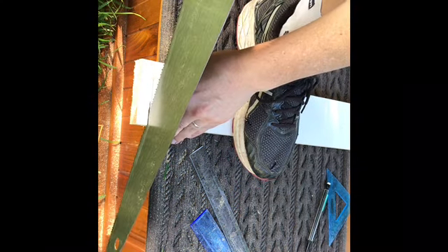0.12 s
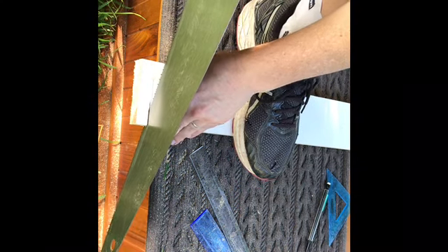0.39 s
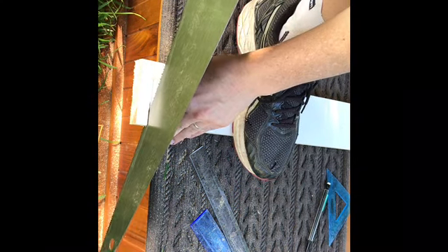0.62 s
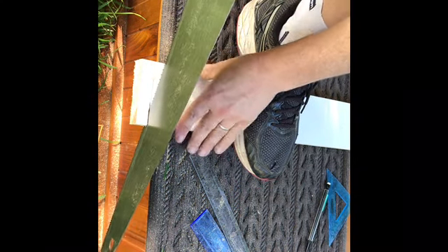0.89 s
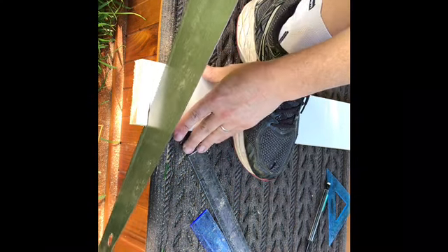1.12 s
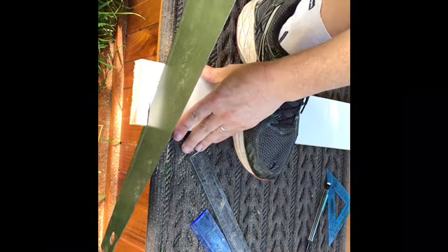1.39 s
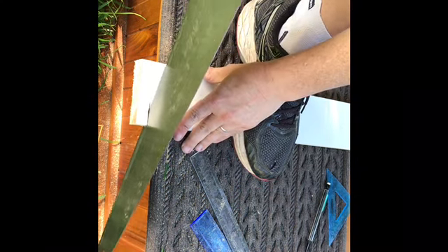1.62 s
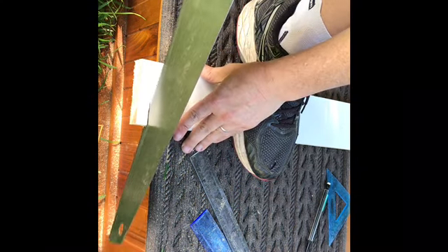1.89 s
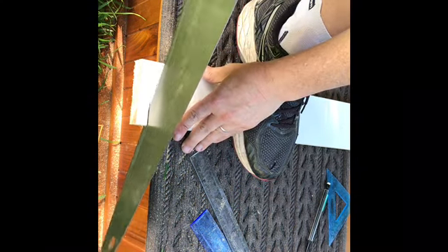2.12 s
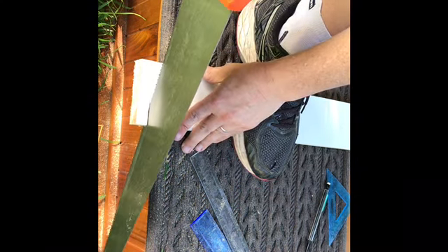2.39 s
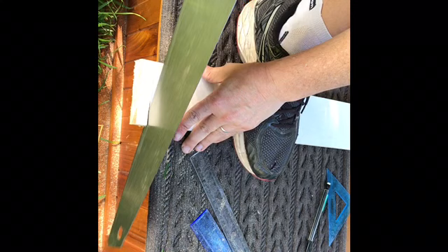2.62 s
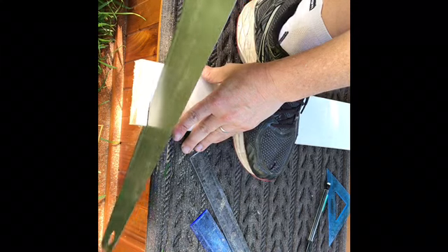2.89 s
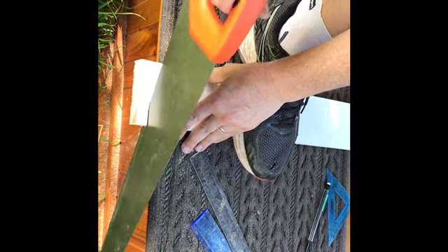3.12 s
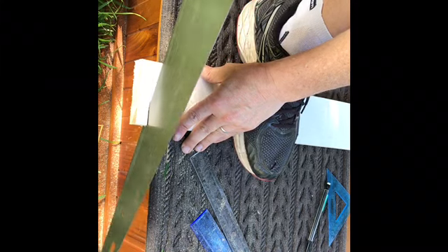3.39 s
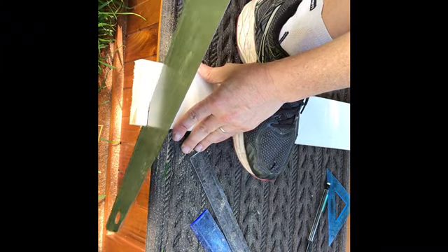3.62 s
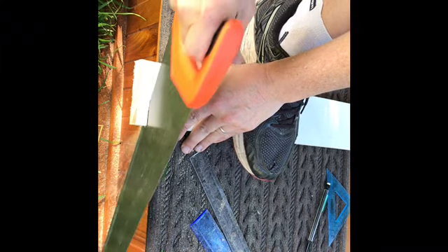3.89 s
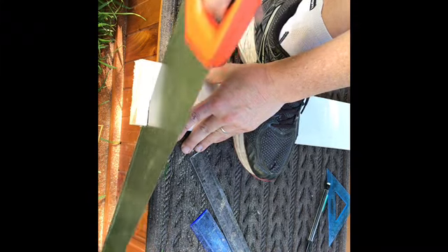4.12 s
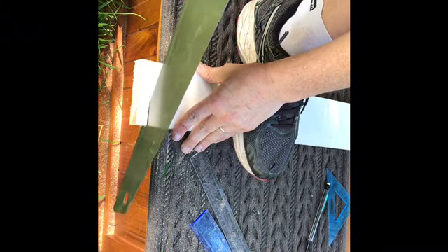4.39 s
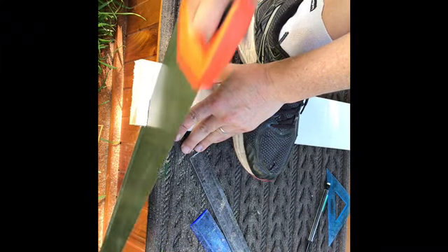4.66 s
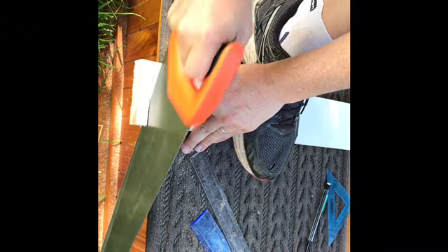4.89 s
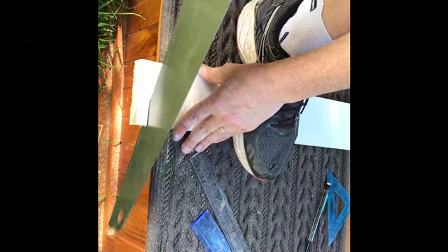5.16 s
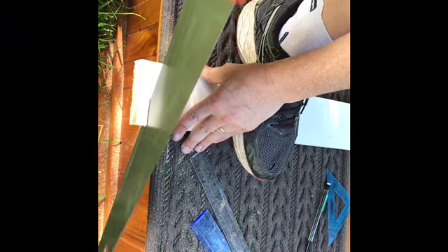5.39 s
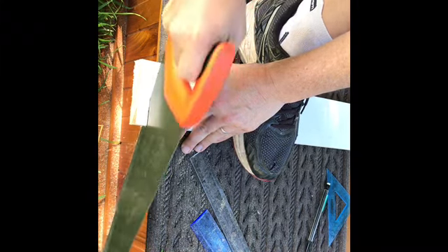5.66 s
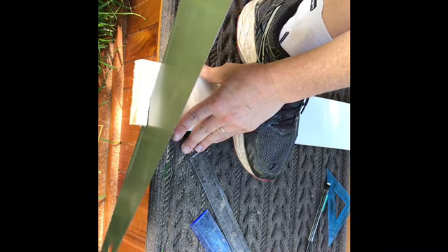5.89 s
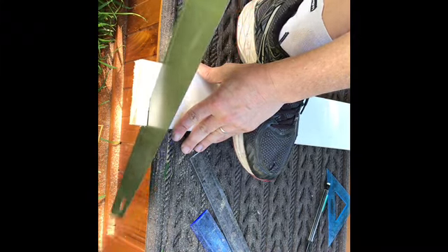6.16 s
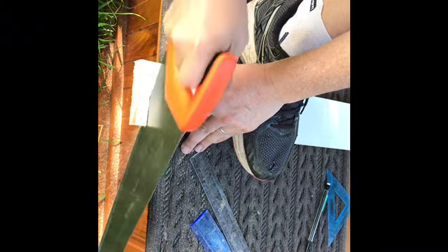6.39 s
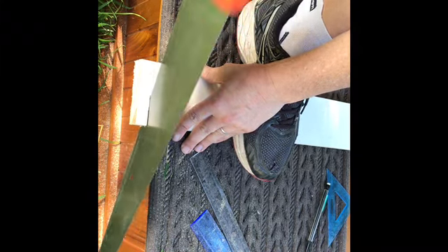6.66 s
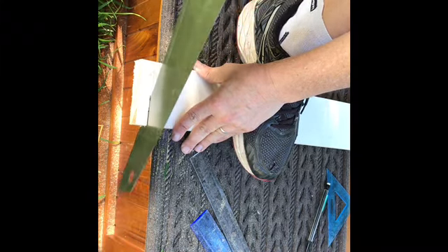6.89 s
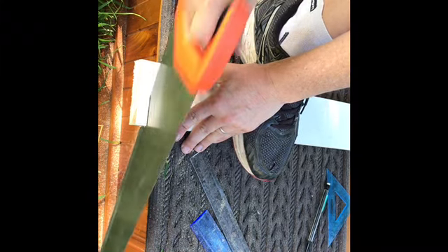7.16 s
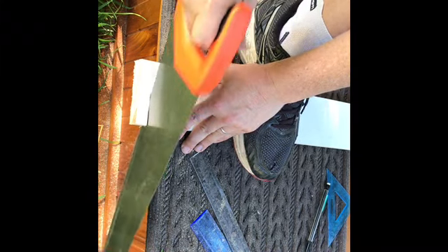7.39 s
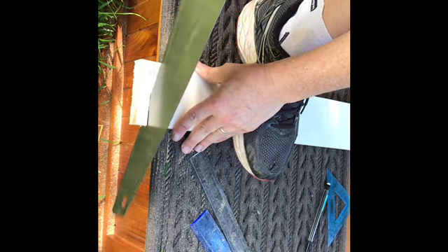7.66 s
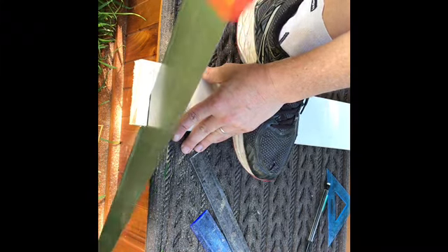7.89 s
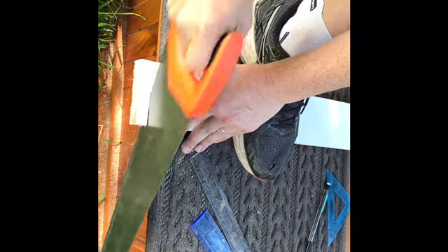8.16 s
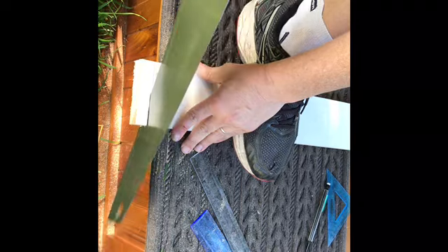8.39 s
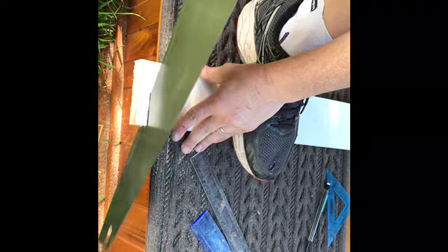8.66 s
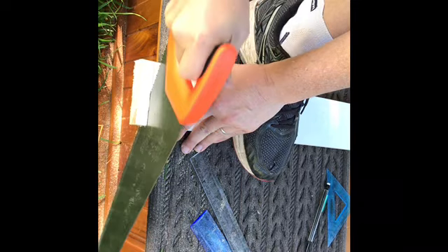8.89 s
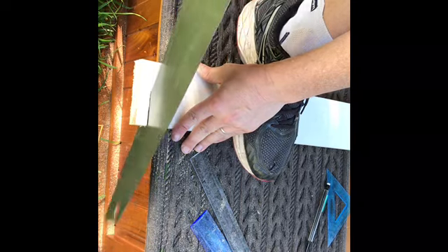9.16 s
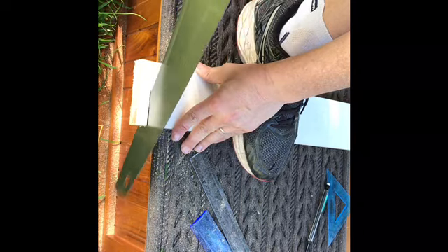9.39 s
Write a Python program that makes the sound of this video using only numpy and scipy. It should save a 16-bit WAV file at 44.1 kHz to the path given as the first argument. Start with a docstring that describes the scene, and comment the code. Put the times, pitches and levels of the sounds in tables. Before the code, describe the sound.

Faint scraping and tiny clicks of a saw finding its groove, over soft far rumble and thin distant bird whistles. The strokes become quicker, brighter and much louder, settling into an even back-and-forth rasp. Each push is harsh and strong, each pull weaker; the blade sometimes slaps the cut with a sharp knock. Hollow wooden resonance, slight dull outdoor echo, close single microphone.

```python
"""A hand saw works through a light board held down by hand and foot, outdoors and close by.
Torn fibres make a dense rasp of random clicks, which rings the steel blade.
Teeth knock on the edge of the cut, faster and slower with each stroke, and ring and rock the board.
Now and then the blade slaps the side of the cut. A dull echo of the sawing follows.
Below lie a far rumble with some rustle, a low hum and the thin whistles of a far bird."""
import sys
import numpy as np
from scipy import signal
from scipy.fft import rfft, irfft, next_fast_len
from scipy.io import wavfile
from scipy.ndimage import uniform_filter1d

SR = 44100
rng = np.random.default_rng(int(sys.argv[2]) if len(sys.argv) > 2 else 0)


def natural_amplitude(level_db):
    """Convert a level in decibels to a linear amplitude factor, elementwise."""
    exponent = np.asarray(level_db, float) / 20
    return 10 ** exponent


def put_to_file(sound):
    """Save the sound as 16-bit audio at rate SR, in the file named by the first command-line argument."""
    columns = np.atleast_2d(sound).T  # one column per channel
    safe = np.clip(columns, -1, 1)
    whole_steps = np.round(safe * 32767)
    wavfile.write(sys.argv[1], SR, whole_steps.astype(np.int16))


N = 420273  # length of the scene in samples

# resonances of the board: (frequency [Hz], width [Hz], level [dB])
BOARD_MODES = [(221, 33.5, -6.5), (264.8, 16, 0.5), (304.9, 16.5, -1.5), (339.8, 19.4, -5.5),
               (412.6, 13, -5), (468.6, 27.6, -9.5), (530, 46, -11), (641, 162, -14), (1005, 480, -28),
               (1156, 140, -22.5), (1484, 41, -14), (1688, 74, -13)]
# the board rocking on what it lies on: (frequency [Hz], width [Hz], level [dB])
SUPPORT_MODES = [(86, 25.5, -2.5), (116.3, 32, 0.5), (139.3, 12.2, -1), (164, 17.6, -1)]
# woody tone of the walls of the cut: (frequency [Hz], level [dB])
KERF_TONE = [(410, -19), (700, -8), (800, -13), (1000, -3), (1250, -5), (1400, -13), (1700, -12.5),
             (2300, -37), (4000, -57)]


def rms_one(x):
    """Scales a sound to an rms (average strength) of 1."""
    return x / np.sqrt(np.mean(x ** 2) + 1e-20)


def in_time(rows):
    """Joins table rows (time, value, ...) into curves with one value a sample."""
    time_s, *columns = np.transpose(rows)
    return [np.interp(np.arange(N) / SR, time_s, column) for column in columns]


def coloured(x, spectrum):
    """Makes each frequency louder or softer, following (frequency [Hz], level [dB]) rows."""
    size = next_fast_len(N)
    hz, db = np.transpose(spectrum)
    log_hz = np.log(np.arange(size // 2 + 1) * SR / size + 1)
    gain = natural_amplitude(np.interp(log_hz, np.log(hz), db))
    return irfft(rfft(x, size) * gain, size)[:N]


def drift(rate):
    """A slow random curve of rms 1 that changes about rate times a second."""
    # drawn once every 40 samples; the first 2000 values let the filter settle
    r = np.exp(-80 * np.pi * rate / SR)
    slow = signal.lfilter([1], [1, -2 * r, r * r], rng.standard_normal(N // 40 + 2002))[2000:]
    return np.interp(np.arange(N) / 40, np.arange(len(slow)), rms_one(slow))


def resonate(x, hz, width_hz):
    """One resonance with gain 1 at its peak: the narrower it is, the longer it rings."""
    r = np.exp(-np.pi * width_hz / SR)
    top = (1 - r * r) / 2
    return signal.lfilter([top, 0, -top], [1, -2 * r * np.cos(2 * np.pi * hz / SR), r * r], x + 1e-18)


def body(x, modes):
    """A solid body rings in several modes at once; their signs alternate."""
    return sum((-1) ** k * natural_amplitude(db) * resonate(x, hz, width_hz)
               for k, (hz, width_hz, db) in enumerate(modes))


def grains(per_s, spread_db):
    """Random clicks of uneven size and either sign, scaled to rms 1."""
    sizes = natural_amplitude(spread_db * np.minimum(rng.exponential(1, N), 5)) * rng.choice([-1, 1], N)
    return rms_one(sizes * (rng.random(N) < per_s / SR))


def strokes():
    """The arm speeds up and brakes along a lopsided arch; the rasp swells and fades with it.

    Gives the teeth per second, the rasp level [dB] and four values of the stroke under way [dB]:
    top rasp level, evenness of the bite, depth of the cut, weight on the board."""
    # strokes: (start [s], end [s], top speed [teeth/s], rasp at top speed [dB], weight on the board [dB])
    pushes = [(0.27, 0.511, 190, -63.5, 0), (0.762, 1.009, 150, -59, 2), (1.251, 1.59, 170, -46, 0.5),
              (1.951, 2.338, 230, -42, 3), (2.711, 3.167, 280, -36.5, 2.5), (3.531, 3.979, 400, -34.5, 6.5),
              (4.4, 4.815, 400, -31.5, 4.5), (5.252, 5.614, 430, -29, 1.5), (6.07, 6.44, 420, -29, 0.5),
              (6.853, 7.285, 400, -30, 1.5), (7.72, 8.098, 400, -29.5, 4.5), (8.51, 8.873, 425, -28.5, 0.5),
              (9.298, 9.73, 500, -26.5, 1.5)]
    pulls = [(0.0, 0.4, 129, -68, -9), (0.41, 0.85, 140, -65, -7), (1.025, 1.306, 131, -57.5, -0.5),
             (1.676, 2.007, 190.8, -50.5, -2), (2.39, 2.786, 184.8, -47.5, 0.5),
             (3.138, 3.594, 321.8, -41.5, -0.5), (3.991, 4.443, 350, -39, 0), (4.822, 5.284, 300, -37, 1.5),
             (5.636, 6.111, 321.5, -37.5, 1), (6.39, 6.939, 340.7, -37.5, 1),
             (7.265, 7.79, 340.6, -40.5, 0), (8.118, 8.543, 346.5, -35, 1),
             (8.898, 9.335, 351.4, -35.5, 2.5)]
    # the blade binds (minus) or breaks free (plus): (time [s], length [s], change of rasp level [dB])
    lurches = [(0.345, 0.036, 1), (0.47, 0.069, 3), (0.867, 0.026, -8), (0.91, 0.013, -3),
               (1.075, 0.032, 5), (1.417, 0.025, 8), (1.457, .025, 0), (1.488, 0.042, 6),
               (1.543, .025, 13.5), (1.847, 0.026, 5), (2.062, 0.018, -8), (2.108, 0.064, 4.5),
               (2.138, 0.016, -10.5), (2.167, 0.039, 4.5), (2.212, 0.023, -6), (2.248, 0.011, -2),
               (2.26, 0.016, 3), (2.57, 0.023, -5), (2.799, 0.037, -5), (2.834, .05, 2.5),
               (3.06, 0.023, -5), (3.096, 0.021, 4.5), (3.237, 0.055, -7), (3.687, 0.013, 5.5),
               (3.796, 0.063, 3), (4.576, .06, 1), (5.07, .03, -0.5), (5.128, 0.026, 1.5),
               (5.336, 0.056, 3.5), (5.641, 0.034, 10), (6.367, 0.048, 5), (6.425, .05, 7),
               (7.281, .04, 10), (7.402, 0.11, -2.5), (7.738, 0.026, -10), (8.55, 0.023, -4),
               (8.75, 0.05, 1)]
    # each kind: (strokes, fastest moment as share of the stroke, sharpness of the swell, of the fade,
    # depth of the cut [dB], evenness of the bite [dB])
    kinds = [(pushes, 0.59, 2.0, 2.5, 1.5, 0.5), (pulls, 0.55, 2, 2, -4, -10)]
    drag_s = 0.045  # the teeth drag this long before the blade gets going
    resting_db = -78  # the blade never quite rests in the cut
    t = np.arange(N) / SR
    rate = np.zeros(N)
    power = np.full(N, natural_amplitude(2 * resting_db))
    held = np.zeros((4, N))
    held[0] = resting_db
    for table, share, rising, falling, depth_db, even_db in kinds:
        for start, end, top_rate, top_db, weight_db in table:
            now = slice(int(start * SR), int(end * SR))
            fastest = start + share * (end - start)
            arch, speed = (np.sin(np.interp(t[now], [s, fastest, end], [0, np.pi / 2, np.pi]))
                           for s in (start, start + drag_s))
            sharpness = np.where(t[now] < fastest, rising, falling)
            own_power = (natural_amplitude(top_db) * arch.clip(0) ** sharpness) ** 2
            # where strokes overlap, the stronger one sets speed and values
            leads = own_power > power[now]
            values = [[top_db], [even_db], [depth_db], [weight_db]]
            held[:, now] = np.where(leads, values, held[:, now])
            rate[now] = np.where(leads, top_rate * speed, rate[now])
            power[now] += own_power
    coarse_t = t[::20]
    lurch_db = sum(db * np.exp(-(2 * (coarse_t - s) / length_s) ** 2) for s, length_s, db in lurches)
    rasp_db = 10 * np.log10(power) + np.interp(t, coarse_t, lurch_db)
    return rate, rasp_db, uniform_filter1d(held, int(.01 * SR))


def rasp(level_db, chatter_db, brightening):
    """Fibres tear as dense clicks while the blade judders; fast hard strokes are brighter."""
    judder_db = chatter_db * (drift(66) + 0.37 * drift(88))
    tearing = grains(per_s=14000, spread_db=2.5) * natural_amplitude(level_db + judder_db)
    sizzle = signal.sosfilt(signal.butter(2, 9000, "high", fs=SR, output="sos"), tearing)
    sizzle_db = brightening * (level_db + 24.5) + 0.49 * drift(25)
    return tearing + sizzle * (natural_amplitude(sizzle_db) - 1)


def catches(rise_s, burst_s):
    """The blade catches or slaps the side of the cut: each time a short burst of noise."""
    # (time [s], level [dB])
    slaps = [(0.3376, -41), (0.5731, -49), (0.6853, -47), (0.8194, -47), (0.8361, -48), (0.8936, -40),
             (0.9373, -36.5), (1.067, -44), (1.1403, -38.5), (1.1672, -39), (1.195, -35), (1.2935, -38.5),
             (1.3518, -39), (1.4065, -40), (1.4803, -27.5), (1.7444, -39), (1.7694, -35), (1.804, -31),
             (1.8342, -32), (2.006, -35.5), (2.0787, -37), (2.119, -29), (2.159, -39), (2.2235, -24.5),
             (2.2497, -20), (2.588, -25), (2.7438, -47), (2.7821, -38), (2.8331, -29), (2.8667, -19.5),
             (2.991, -19), (3.1681, -36.5), (3.2398, -22.5), (3.269, -29), (3.4, -67), (3.5848, -33),
             (3.6731, -27), (3.7492, -26), (4.0464, -31), (4.4531, -33), (4.4992, -25), (4.8958, -32),
             (5.2967, -55), (5.3308, -22), (6.113, -82), (6.129, -30), (6.761, -20.5), (6.9439, -31),
             (6.989, -17), (7.5672, -24), (7.78, -27), (8.53, -33), (8.9423, -28), (9.3531, -45.5)]
    time_s, db = np.transpose(slaps)
    burst = np.zeros(N)
    burst[(time_s * SR).astype(int)] = natural_amplitude(db - 10.0)  # noise rms lies below its peak
    burst = signal.lfilter([1], [1, -np.exp(-1 / (burst_s * SR))], burst + 1e-18)
    return uniform_filter1d(burst, int(rise_s * SR)) * rng.standard_normal(N)


def steel(x, ring_db, shifting_db, crowd_db, crowd_width_hz):
    """The blade adds its ringing; as the point of contact travels, modes come and go."""
    # resonances of the blade: (frequency [Hz], width [Hz], level [dB])
    blade_modes = [(2245, 59, -7.5), (2510, 55, -14.5), (2910, 134, -7.5), (3326, 72, -0.5), (3525, 69, 1),
                   (3840, 33, -2.5), (4284, 55, -2), (4734, 74, -0.5), (5190, 37, -4.5), (5560, 83, -1),
                   (5903, 70, -2)]
    # high up the modes crowd too closely to be named one by one
    crowd_hz = np.linspace(6300, 15500, 36) + rng.uniform(-120, 120, 36)
    modes = blade_modes + [(hz, crowd_width_hz, crowd_db) for hz in crowd_hz]
    return x + sum(resonate(x * natural_amplitude(db + ring_db + shifting_db * drift(20)), hz, width_hz)
                   for hz, width_hz, db in modes)


def blade(rubbing):
    """Rubbing wood rings the steel blade, which gives the rasp its tone."""
    # tone of the rasp: (frequency [Hz], level [dB])
    rasp_tone = [(1300, -15), (1900, -13.5), (2350, -16.5), (5500, -14.5), (7500, -15.5), (10000, -13),
                 (14000, -7.5), (16000, -9.5)]
    ringing = steel(rubbing, ring_db=1.0, shifting_db=4.0, crowd_db=-2.0, crowd_width_hz=108)
    return natural_amplitude(16) * coloured(ringing, rasp_tone)


def bite(rate, even_db, uneven_db, contact_hz):
    """The force on the wood: one soft push per tooth, wavering in time and size, plus torn fibres."""
    teeth = 2 * np.pi * np.cumsum(rate * (1 + .035 * drift(30))) / SR
    pushes = (np.sin(teeth) + 0.43 * np.sin(2 * teeth)) * natural_amplitude(uneven_db * drift(16.3))
    # the contact is soft, so it dulls the clicks of the fibres
    softness = signal.butter(1, contact_hz, fs=SR, output="sos")
    fibres = signal.sosfilt(softness, grains(per_s=900, spread_db=4.0))
    return natural_amplitude(even_db) * pushes + rms_one(fibres)


def board(rate, level_db, top_db, even_db, weight_db):
    """The bite rings the board and rocks it on its support, most when the tooth rate passes a mode."""
    # the cut guides the blade, so even tooth pushes grow or shrink: (time [s], level [dB])
    guiding = [(0, -18), (3.5, -18), (5.5, -13), (6.2, -7), (6.42, -5), (6.52, -4), (6.66, 6), (6.8, -6),
               (6.98, -4), (7.15, -16), (7.84, -4), (7.98, -16), (8.65, -5), (8.86, -2), (9.0, -9),
               (9.38, -11), (9.53, -5)]
    # how loosely the board lies; on the whole it settles as hand and foot press: (time [s], level [dB])
    looseness = [(0, 4), (0.8, 4), (1.4, 8.5), (2.2, 7.5), (3.0, 6.5), (3.8, 3.5), (4.6, 3.5), (5.5, 1),
                 (6.3, 1), (7.2, 0), (8.2, 1), (8.9, 2.5), (9.3, -1.5), (9.53, -4)]
    ringing_db, rocking_db = -31.5, -37  # mean levels
    ringing_follows, rocking_follows = 0.72, 0.51  # share of the rasp's swing in dB that they follow
    tooth_follows = 0.29  # share of the swell and fade that the push of each tooth follows
    faded_db = np.minimum(level_db - top_db, 0)
    even_db = even_db + in_time(guiding)[0] - (1 - tooth_follows) * np.maximum(faded_db, -20)
    force = bite(rate, even_db, uneven_db=5.0, contact_hz=840)
    pressed_db = level_db + weight_db
    ringing = body(force * natural_amplitude(ringing_follows * pressed_db), BOARD_MODES)
    rocking = body(force * natural_amplitude(rocking_follows * pressed_db + in_time(looseness)[0]), SUPPORT_MODES)
    return natural_amplitude(ringing_db) * rms_one(ringing) + natural_amplitude(rocking_db) * rms_one(rocking)


def kerf(level_db, top_db, depth_db, softening, fading):
    """Coarser tearing sounds through the wood beside the cut; it sets in early and lasts."""
    stroke_db = softening * (top_db + 39.0) + fading * (level_db - top_db)
    tearing_db = stroke_db + depth_db + 1.67 * drift(21)
    return coloured(grains(per_s=5000, spread_db=3.0) * natural_amplitude(tearing_db - 23.5), KERF_TONE)


def knocks(caught):
    """Each catch of the blade also knocks on the walls of the cut and rings and rocks the board."""
    return natural_amplitude(6) * coloured(caught, KERF_TONE) + natural_amplitude(15) * body(caught, BOARD_MODES + SUPPORT_MODES)


def yard(x):
    """Walls and ground nearby send back a short, dull wash of fading noise."""
    level_db, t60_s, cut_hz = -21.5, 0.1, 2900  # t60: time to fade by 60 dB
    t = np.arange(int(t60_s * SR)) / SR
    wash = rng.standard_normal(len(t)) * natural_amplitude(-60 * t / t60_s) * (t > .008)
    wash = signal.sosfilt(signal.butter(1, [500, cut_hz], "band", fs=SR, output="sos"), wash)
    return natural_amplitude(level_db) * signal.fftconvolve(x, wash / np.sqrt(np.sum(wash ** 2)))[:N]


def bird(warble):
    """A far bird: thin, husky, wavering whistles, each a sine that swells and fades."""
    # (start [s], end [s], frequency [Hz], level [dB])
    notes = [(0.017, 0.075, 5560, -62), (0.024, .1, 3000, -65), (.06, .11, 2370, -62),
             (0.13, 0.183, 5300, -72), (0.138, 0.264, 2340, -65), (0.147, .22, 3030, -69),
             (0.303, 0.367, 2680, -63), (0.435, .535, 3000, -65), (0.527, 0.574, 2340, -64),
             (2.3, 2.36, 4350, -62), (2.73, 2.76, 3070, -52)]
    t = np.arange(N) / SR
    wavering_t = np.cumsum(1 + warble * drift(80)) / SR
    out = np.zeros(N)
    for start, end, hz, db in notes:
        swell = np.sin(np.interp(t, [start, end], [0, np.pi]))
        out += natural_amplitude(db) * swell * np.sin(2 * np.pi * hz * wavering_t)
    return out * natural_amplitude(3.5 * drift(90) - 3)


def air():
    """Far rumble and rustle: coloured noise that swells and flickers a little."""
    # tone of the rumble and rustle: (frequency [Hz], level [dB])
    air_tone = [(18, -44), (30, -21), (108, -2), (238, -6.5), (301, -12), (457, -19), (1090, -16),
                (2000, -23), (3100, -30), (3900, -38), (5510, -39), (8000, -35.5), (16000, -46)]
    # swells of the rumble: (time [s], level [dB])
    swells = [(0, 0), (1.0, 0), (1.65, 8), (2.4, 7), (4, 9), (5.6, 1.5), (7.3, 9), (8.9, 6), (9.53, 16)]
    flicker_db = 1.2 * drift(8)
    noise = rms_one(coloured(rng.standard_normal(N), air_tone))
    return noise * natural_amplitude(-57 + in_time(swells)[0] + flicker_db)


def hum():
    """A low hum swells and fades: one sine that wanders in pitch and strength."""
    # (time [s], level [dB])
    hum_swells = [(0, -60), (0.6, -58.5), (1.6, -58), (2.1, -50.5), (2.73, -48.5), (2.85, -52),
                  (3.6, -53.5), (4.2, -54), (4.75, -59), (5.2, -53.5), (5.6, -60), (6.6, -56), (7.4, -49.5),
                  (8.04, -51), (8.85, -47), (9.53, -40)]
    hum_hz, width_hz = 55.7, 7.05
    turns = np.cumsum(hum_hz + width_hz / 2 * drift(6.4)) / SR
    wave = np.sqrt(2) * np.sin(2 * np.pi * turns)
    return wave * natural_amplitude(3.0 * drift(5.7)) * natural_amplitude(in_time(hum_swells)[0])


def scene():
    """Blade, cut and board with their echo, over bird, rumble and hum."""
    rate, rasp_db, (top_db, even_db, depth_db, weight_db) = strokes()
    caught = catches(rise_s=0.0035, burst_s=0.006)
    rubbing = rasp(rasp_db, chatter_db=1.0, brightening=0.29) + caught
    wood = kerf(rasp_db, top_db, depth_db, softening=1.0, fading=0.76)
    wood = wood + board(rate, rasp_db, top_db, even_db, weight_db)
    sawing = blade(rubbing) + knocks(caught) + wood
    return (sawing + yard(sawing) + bird(warble=0.0177) + air() + hum())[None]


def top_cut(x):
    """Nothing passes above the cut-off."""
    return signal.sosfilt(signal.butter(12, 17040, fs=SR, output="sos"), x)


def record(dry):
    """Deep bass is cut; the treble takes one step down, then a steep cut."""
    step_hz, step_db, cutoff_hz = 6050, -9, 15710
    # (frequency [Hz], level [dB])
    edges = [(20, -9), (40, 0), (step_hz - 40, 0), (step_hz + 40, step_db),
             (cutoff_hz, step_db), (cutoff_hz + 120, -62)]
    mix = coloured(dry[0], edges)[None]
    return top_cut(mix)


dry = scene()
out = record(dry)
put_to_file(out)
```